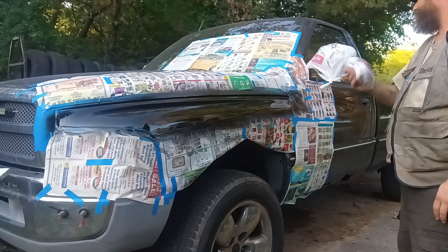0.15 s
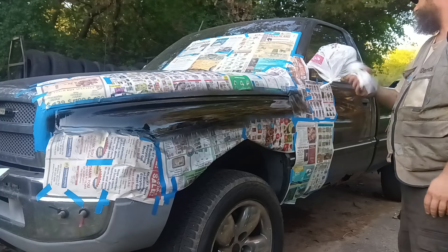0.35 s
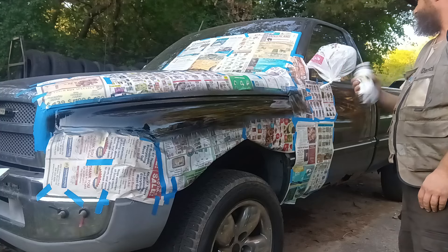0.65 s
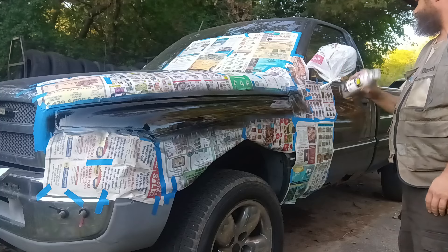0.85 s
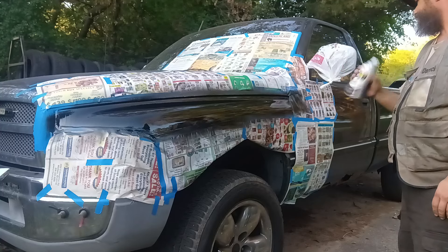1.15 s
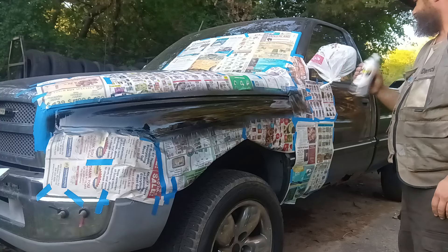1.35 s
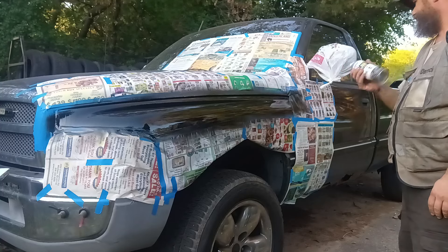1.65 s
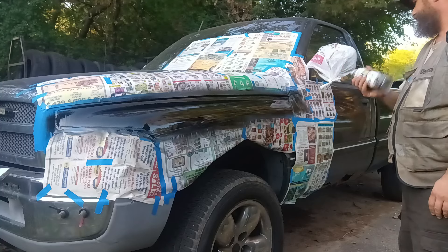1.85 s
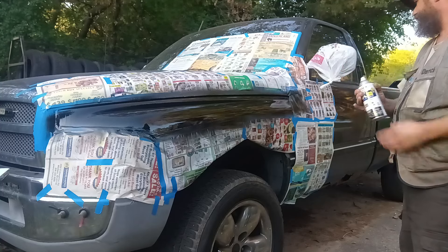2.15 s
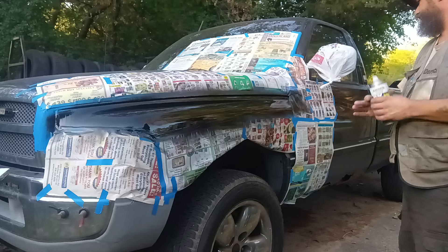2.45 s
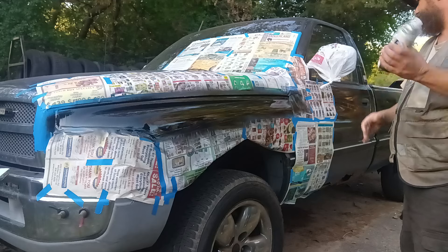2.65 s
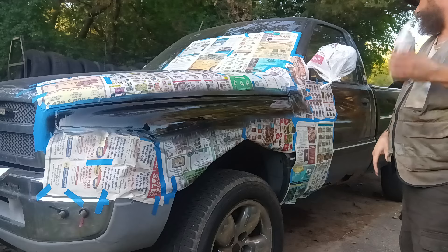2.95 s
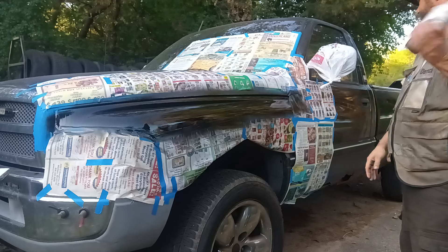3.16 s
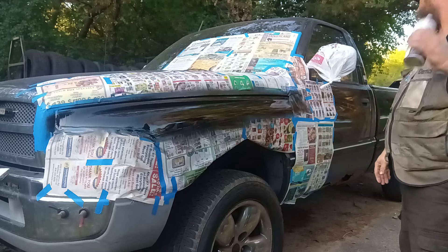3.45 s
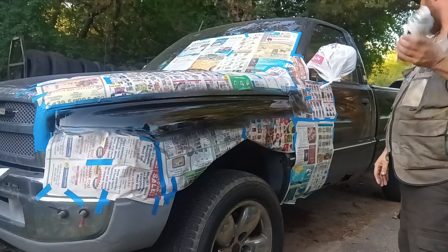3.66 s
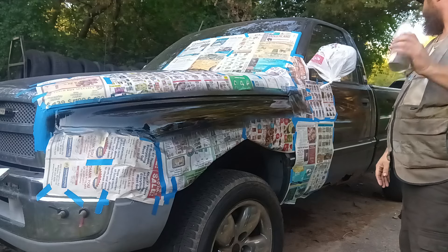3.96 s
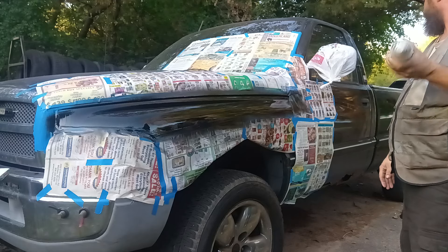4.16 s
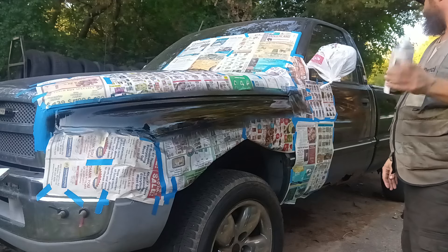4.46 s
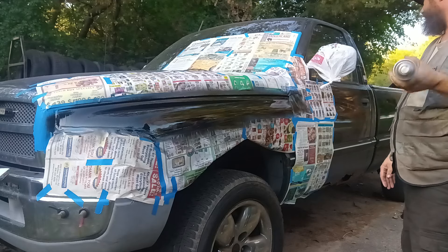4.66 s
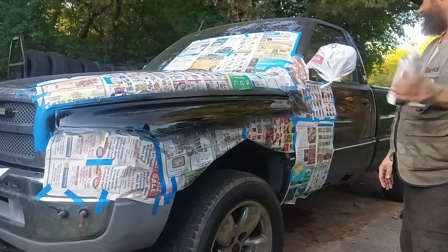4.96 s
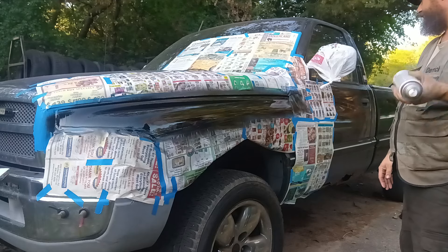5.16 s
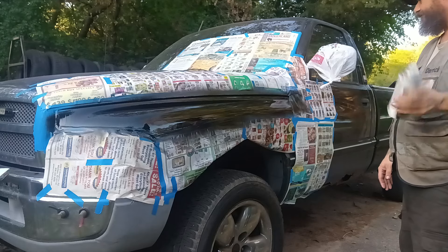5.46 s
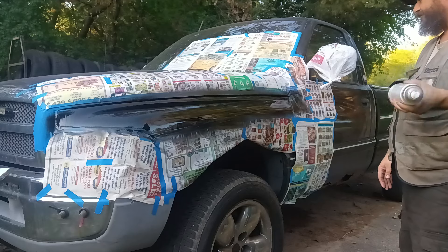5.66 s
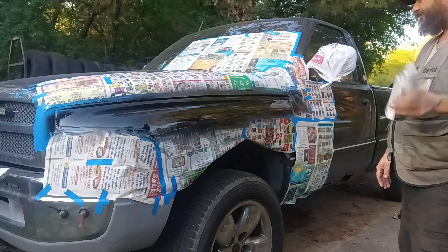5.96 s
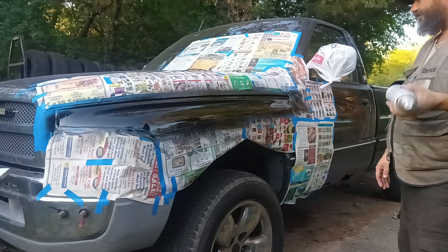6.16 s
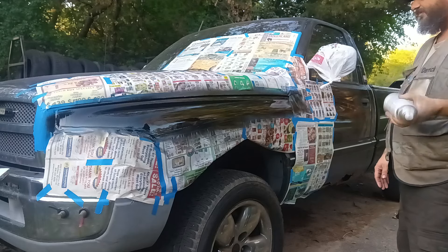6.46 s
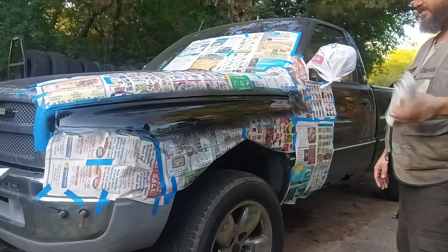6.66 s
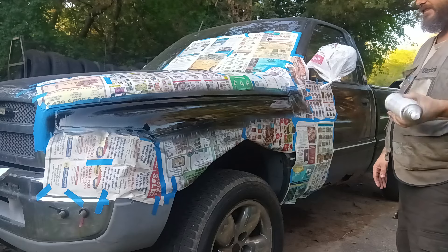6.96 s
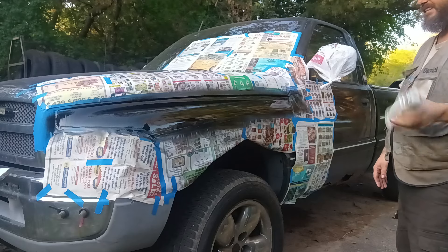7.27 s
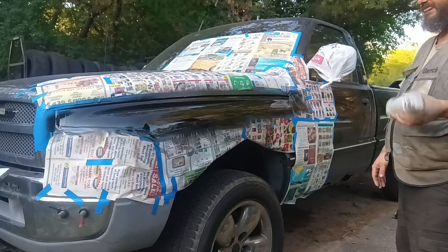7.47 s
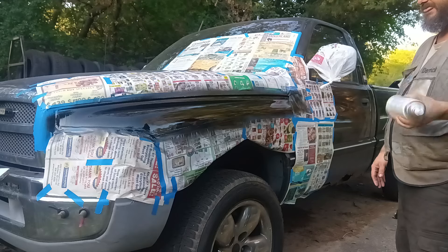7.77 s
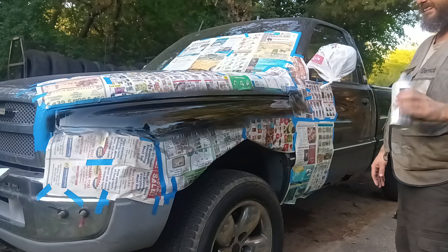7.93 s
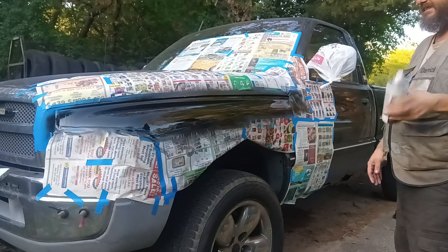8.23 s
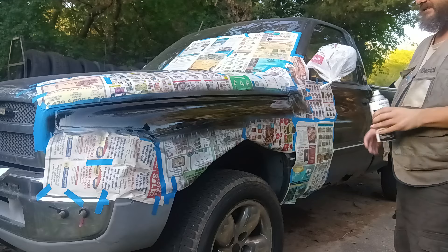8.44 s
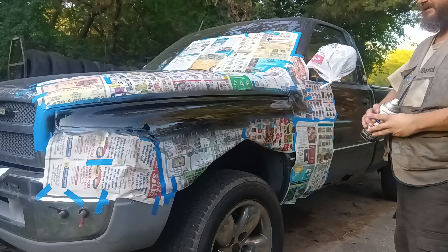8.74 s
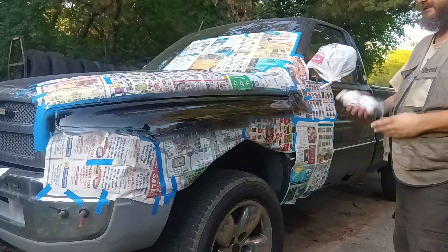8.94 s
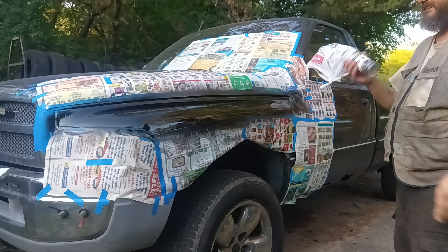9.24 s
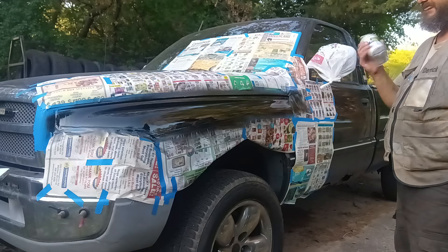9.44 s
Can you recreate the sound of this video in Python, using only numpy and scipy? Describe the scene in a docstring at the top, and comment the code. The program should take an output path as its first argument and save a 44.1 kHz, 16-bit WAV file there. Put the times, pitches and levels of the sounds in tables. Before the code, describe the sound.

In a quiet yard, with leaves softly hissing and a far, humming rumble, someone shakes an aerosol can near the microphone. The ball inside rattles in quick, bright, irregular clinks with a slight gritty scrape. After a short lull comes a longer stretch of shaking, then lighter, sparser clicks, a dull low bump and a last brief rattle as the background rises. The clicks have only very short reflections.

```python
"""Spray-paint can shaken beside a parked truck.

The mixing ball knocks the steel wall and domed ends, bounces and scrapes on. Ground and truck throw
each click back. Leaf hiss, far rumble and wavering hums fill the pauses. Two microphone ports a hand
apart hear it: the left one later, louder and with a sharp treble resonance."""
import sys
import numpy as np
from scipy import signal
from scipy.fft import rfft, irfft
from scipy.io import wavfile
from scipy.ndimage import uniform_filter1d

SR = 44100
rng = np.random.default_rng(int(sys.argv[2]) if len(sys.argv) > 2 else 0)


def generate_wav(signal):
    """Clip the signal to [-1, 1] and save it as 16-bit WAV at the path in sys.argv[1]."""
    frames = np.transpose(np.atleast_2d(signal))
    scaled = np.clip(frames, -1, 1) * 32767
    pcm = np.round(scaled).astype(np.int16)
    wavfile.write(sys.argv[1], SR, pcm)


N = 423360

# leaf hiss spectrum: f/Hz, relative density/dB
HISS_SPECTRUM = [(60, -15), (200, -2.5), (350, -20), (650, 1), (1020, -6.5), (2290, -9), (5650, -3.5),
                 (7060, 6.5), (9000, -17), (16500, -61)]
# far rumble spectrum: f/Hz, relative density/dB
RUMBLE_SPECTRUM = [(30, -28), (55, -29), (80, -14), (120, -6), (200, -31), (350, -18), (1000, -23),
                   (3000, -63)]
# background swell: t/s, hiss level/dB
SWELL = [(0, -40), (1.45, -42.5), (1.56, -48.5), (2.3, -46.5), (3.15, -38), (3.3, -42), (7.0, -47.5),
         (8.15, -38.5), (8.7, -29), (9.6, -33.5)]
# passing hums: start/s, end/s, f/Hz, level/dB
HUMS = [(.58, 1.36, 80, -47), (1.6, 4.06, 80.7, -55), (4.6, 7.21, 83.6, -59), (7.4, 14, 77.8, -45),
        (2.9, 3.92, 153, -54), (-.2, 0.96, 570, -52), (1.1, 1.65, 522, -51), (3.5, 5.2, 657, -57),
        (2.15, 3.3, 626, -45), (6.9, 7.9, 612, -55), (8.1, 8.51, 514, -48), (8.6, 10.4, 619, -44)]
# hand bumps: t/s, level/dB
THUMPS = [(8.531, -16)]
# ground and truck reflections: delay/s, level/dB
ECHOES = [(.0033, -14), (.0165, -21)]
# diffuse tail decay: f/Hz, t60/s
TAIL_DECAY = [(1200, 0.16), (3200, 0.11), (13000, 0.013)]
# ball on steel: t/s, wall level/dB, wall f/Hz, clink level/dB
KNOCKS = [(0.011, -14, 3730, -16), (0.1894, -9.5, 3780, -7), (0.2677, -17, 3580, -21.5),
          (0.359, -13.5, 3620, -18), (0.5274, -15, 5100, -9.5), (0.5498, -12.5, 3700, -38),
          (0.561, -19, 3230, -20.5), (0.7114, -11, 5020, -9.5), (0.8656, -12, 3640, -4),
          (0.8762, -20, 3360, -26), (0.9517, -12, 3820, -9.5), (0.9873, -18.5, 3380, -1),
          (1.0044, -17.5, 2170, -17), (1.0476, -18.5, 3360, -14), (1.0665, -12, 3370, -9.5),
          (1.122, -17.5, 3300, -19.5), (1.1465, -19, 3700, -20), (1.156, -22, 4020, -17.5),
          (1.191, -22.5, 3120, -30), (1.213, -7, 3480, -23), (1.2407, -7.5, 3600, -14),
          (1.2992, -15, 2940, -6.5), (1.3241, -15.5, 3370, -6), (1.409, -25, 3940, -14),
          (1.4405, -12, 3400, -7.5), (1.4563, -17, 3900, -7.5), (1.469, -19, 3950, -20),
          (1.5076, -14.5, 3050, -7.5), (1.5176, -29, 3230, -16), (1.5348, -21.5, 3470, -27),
          (1.6682, -24, 4820, -15), (1.7468, -22, 3150, -14), (1.7591, -28, 3540, -17),
          (1.8582, -18, 4120, -22.5), (1.9058, -11.5, 5180, -9), (1.9256, -18, 4070, -17),
          (2.2644, -46, 2200, -21), (2.589, -29.5, 2290, -23.5), (2.7836, -34, 4500, -22),
          (2.88, -29, 1680, -23), (2.9392, -34.5, 1420, -29), (3.0338, -19.5, 4600, -12),
          (3.1537, -12, 3130, -5.5), (3.1959, -24.5, 1390, -10), (3.2499, -14.5, 3770, -5),
          (3.2892, -16, 4840, -10.5), (3.3776, -21, 1600, -4), (3.482, -27, 1820, -25),
          (3.5698, -14, 3700, -10.5), (3.5876, -8, 3140, -9.5), (3.706, -15, 3200, -11),
          (3.7136, -7, 3200, -4), (3.8553, -16, 2360, -6.5), (3.8623, -9, 4240, -6.5),
          (3.8849, -14, 3180, -9), (3.8987, -15.5, 3640, -21), (3.927, -13.5, 3440, -41),
          (3.9823, -20, 3320, -16), (4.0032, -15.5, 5150, -15), (4.0421, -14.5, 4950, -11.5),
          (4.0696, -13, 3500, -22), (4.1298, -24, 3140, -14.5), (4.2076, -16.5, 3650, -11.5),
          (4.234, -8.5, 3250, -23), (4.3002, -20.5, 3600, -25), (4.3118, -29, 2530, -20.5),
          (4.3224, -19, 3420, -21), (4.3415, -10.5, 3660, -19), (4.3662, -22, 4840, -26),
          (4.3874, -19, 3830, -19.5), (4.4555, -18, 3350, -4.5), (4.5062, -9.5, 3340, -21),
          (4.5507, -13, 3290, -43), (4.6548, -20, 4960, -15.5), (4.7562, -15.5, 3260, -25),
          (4.8883, -20, 4800, -20), (5.0434, -32, 2380, -15), (5.0554, -27, 3320, -10.5),
          (5.1055, -20, 3350, -9.5), (5.132, -18, 3320, -40), (5.1603, -11.5, 3820, -18.5),
          (5.2902, -12.5, 3260, -10), (5.3398, -13.5, 3840, -7.5), (5.3723, -14, 3260, -25),
          (5.3944, -20, 3820, -9.5), (5.508, -11.5, 3200, -12), (5.5373, -16, 3750, -11),
          (5.54, -16, 3970, -8), (5.5862, -7.5, 5100, -4.5), (5.6361, -17, 3770, -18),
          (5.6508, -14.5, 3970, -23), (5.6664, -14.5, 3670, -20), (5.727, -22, 3750, -5.5),
          (5.754, -21, 3430, -40), (5.8321, -10, 5000, -6), (5.8495, -20, 4200, -20),
          (5.8747, -17, 3360, -22), (5.9126, -22, 3180, -19), (5.9297, -17, 3520, -18),
          (5.9796, -17, 3300, -9), (6.0121, -15, 3320, -26), (6.0756, -15.5, 3400, -14.5),
          (6.1103, -13, 3310, -19), (6.158, -16.5, 3680, -20), (6.2388, -14, 3800, -8),
          (6.2982, -15, 5080, -16), (6.352, -12.5, 3790, -10), (6.3696, -20, 3740, -11.5),
          (6.3877, -11.5, 3210, -26), (6.4367, -14.5, 4040, -16), (6.6005, -19, 3120, -3.5),
          (6.6685, -19.5, 4330, -7), (6.7001, -13.5, 3660, -11), (6.8148, -10.5, 3270, -21),
          (6.842, -22, 4040, -22.5), (6.8775, -14.5, 5000, -12.5), (6.9045, -17.5, 3350, -9),
          (6.9247, -10, 5290, -31), (7.1031, -27, 2520, -17), (7.132, -11.5, 3160, -25),
          (7.2193, -32, 5000, -26), (7.553, -35, 2020, -29), (7.5716, -22.5, 3060, -21.5),
          (7.7446, -28, 3500, -15.5), (7.835, -23.5, 3210, -21.5), (7.974, -25, 3560, -7),
          (7.9963, -45, 3660, -24), (8.0282, -31, 1800, -15.5), (8.0895, -23, 3100, -16),
          (8.1088, -23.5, 3230, -18), (8.1586, -21.5, 1310, -22.5), (8.2235, -17, 2000, -5.5),
          (8.288, -26.5, 2270, -13), (8.3394, -17.5, 3210, -18.5), (8.526, -29, 1550, -23),
          (8.544, -25, 1240, -22.5), (8.608, -22, 1240, -24), (8.9755, -26.5, 3140, -19.5),
          (9.2616, -16, 2210, -14), (9.366, -27, 1970, -18.5), (9.413, -32, 4070, -16),
          (9.4537, -5, 2440, -11.5), (9.4728, -37, 2250, -20.5), (9.5082, -24.5, 2510, -17),
          (9.5443, -19.5, 1530, -12), (9.5777, -31, 1760, -22)]
# wall modes, damped by paint and hand: ratio to wall f, level/dB, t60/s
WALL_MODES = [(0.798, 5, 0.0045), (1, 12, 0.007), (1.2, 3, 0.0091)]
# bright clink modes: f/Hz, level/dB, t60/s
CLINK_MODES = [(5320, 3.5, 0.002), (5905, 6.5, 0.004), (7058, 9.5, 0.0051), (7960, -0.5, 0.0023),
               (10980, -24.5, 0.0093), (13000, -28, 0.003)]
# hollow modes of the domed end: ratio to dome f, level/dB, t60/s
DOME_MODES = [(.75, 14.5, 0.0017), (1.02, 5.5, 0.0093), (1.351, 14, 0.0032)]
# dome tone, set by tilt and where the paint lies: t/s, dome f/Hz, level re knock/dB
DOME_TILT = [(2.6, 2050, -19.5), (2.9, 1400, -6.5), (3.5, 1730, -29.5), (3.9, 1870, -24), (7.2, 1805, -25),
             (8.1, 1390, -11.5), (9.5, 1170, -6.5)]
# left port's gain over the right: f/Hz, level/dB
LEFT_EXCESS = [(30, 5), (150, 2.5), (300, 8), (3300, 8.5), (5500, 11), (7200, 16), (8800, 0), (11000, -5),
               (15000, -6)]


def gain_of(db):
    """Decibels to gain."""
    return 10 ** (np.asarray(db) / 20)


def unit_rms(x):
    """Scales to rms 1."""
    return x / np.sqrt(np.mean(x ** 2) + 1e-20)


def at_hz(table, hz):
    """Spectrum table interpolated over log frequency."""
    f, value = np.transpose(table)
    return np.interp(np.log(hz + 1), np.log(f + 1), value)


def follow(table, column):
    """One column of a time table at every sample."""
    rows = np.array(table)
    return np.interp(np.arange(N) / SR, rows[:, 0], rows[:, column])


def patchy_noise(spectrum, coherence, patchy_db):
    """Stereo noise, rms 1, uneven over time and frequency."""
    frames, hz = N // 256 + 5, np.fft.rfftfreq(1024, 1 / SR)
    a, b, c, d, patches = rng.standard_normal((frames, 513, 5)).T
    patches = unit_rms(uniform_filter1d(uniform_filter1d(patches, size=8, axis=0), size=14, axis=1))
    left = a + 1j * b
    right = coherence * left + np.sqrt(1 - coherence ** 2) * (c + 1j * d)
    bins = np.array([left, right]) * gain_of(at_hz(spectrum, hz)[:, None] + patchy_db * patches)
    return unit_rms(signal.istft(bins, nperseg=1024, noverlap=768)[1][:, :N])


def leaves_and_rumble():
    """Leaf hiss and far rumble under one background level that rises and falls; the rumble follows it more
    steeply."""
    hiss_db = follow(SWELL, 1)
    rumble_db = 4.5 + 1.425 * hiss_db
    hiss = gain_of(hiss_db) * patchy_noise(HISS_SPECTRUM, coherence=.1, patchy_db=.6)
    return hiss + gain_of(rumble_db) * patchy_noise(RUMBLE_SPECTRUM, coherence=.3, patchy_db=4.5)


def hums():
    """Tones that waver at random, each fading in and out."""
    t, out = np.arange(N) / SR, np.zeros(N)
    for start_s, end_s, hz, db in HUMS:
        width_hz = hz / 40
        white = rng.standard_normal((N, 2)) @ [1, 1j]
        waver = signal.lfilter([1], [1, -np.exp(-np.pi * width_hz / SR)], white)
        tone = unit_rms((waver * np.exp(2j * np.pi * hz * t)).real)
        fade = np.sin(np.pi * np.clip((t - start_s) / (end_s - start_s), 0, 1)) ** .7
        out += gain_of(db) * fade * tone
    return out


def hand_thump(hz=110, t60_s=.027):
    """A hand bumps something soft: one damped low tone."""
    out = np.zeros(N)
    for start_s, db in THUMPS:
        age_s = np.maximum(np.arange(N) / SR - start_s, 0)
        out += gain_of(db - 60 * age_s / t60_s) * np.sin(2 * np.pi * hz * age_s)
    return out


def yard(direct, tail_db=-13, build_s=.006, turn_hz=3.1):
    """Adds echoes and a short diffuse tail; three responses take turns as the can moves."""
    reflected, size = np.zeros((2, N)), 8000
    for k in range(3):
        hz, t, bins = signal.stft(rng.standard_normal((2, size)), SR, nperseg=128)
        decay = gain_of(-60 * t / at_hz(TAIL_DECAY, hz)[:, None])
        response = signal.istft(bins * decay, SR, nperseg=128)[1][:, :size]
        response *= gain_of(tail_db) / np.linalg.norm(response[0])
        response *= np.minimum(np.arange(size) / SR / build_s, 1)
        for delay_s, db in ECHOES:
            response[:, round(delay_s * SR * rng.uniform(.9, 1.1))] += gain_of(db) * rng.choice([-1, 1])
        turn = np.sqrt(2 / 3) * np.cos(2 * np.pi * (np.arange(N) / SR * turn_hz + k / 3))
        reflected += signal.oaconvolve(turn * direct, response, axes=1)[:, :N]
    return direct + reflected


def ball_scrape(knocks, roll_s=.0089, ticks_per_s=3500):
    """The ball scrapes on after each knock: gritty ticks under the knocks' envelope."""
    pole = np.exp(-1 / (roll_s * SR))
    motion = signal.lfilter([1 - pole], [1, -pole], np.abs(knocks[0]))
    ticks = gain_of(3.6 * rng.exponential(1, (2, N)).clip(0, 5))
    ticks *= rng.random((2, N)) < ticks_per_s / SR
    ticks *= rng.choice([-1, 1], (2, N))
    return signal.sosfilt(signal.butter(4, [2300, 7800], "band", fs=SR, output="sos"), motion ** .8 * ticks)


def ball_bounces(hz, count=16, spread_db=13, fade_db_per_s=420, db_per_octave=3):
    """Impulses per mode: small bounces land on other spots, weaker as the ball slows."""
    when, softness = rng.random((2, count))
    spot_loss = rng.random((len(hz), count)) ** .5
    delay_s = .0025 + .045 * when ** 1.3
    level_db = -3.5 - spread_db * (spot_loss + softness) - fade_db_per_s * delay_s
    impulses = np.zeros((len(hz), 4000))
    impulses[:, (delay_s * SR).astype(int)] = gain_of(level_db)
    octaves_below = -np.log2(np.minimum(hz / 6000, 1))
    return impulses * gain_of(db_per_octave * octaves_below)  # lower modes stronger


def ball_knock(hz, db, t60_s, spot_db=2.8, side_db=3):
    """One blow and its bounces ring the modes. Paint shifts pitch; spot and side heard shift level."""
    t = np.arange(700) / SR
    scatter = rng.standard_normal((4, len(hz), 1))
    scatter[:3, :len(WALL_MODES)] = 0  # wall modes scatter only at the right port
    slosh, spot, side = scatter[0], scatter[1], scatter[2:]
    hz = hz * (1 + .04 * slosh)
    bounces = ball_bounces(hz)
    phase = 2 * np.pi * rng.random((len(hz), 1))
    contact = 1 - np.exp(-(t / (.092 * t60_s)) ** 2)  # ball presses in; long rings swell more slowly
    rings = contact * gain_of(db + spot_db * spot - 60 * t / t60_s) * np.sin(2 * np.pi * hz * t + phase)
    out = np.zeros((2, bounces.shape[1]))
    out[:, :len(t)] = (gain_of(side_db * side) * rings).sum(1)
    return out + signal.fftconvolve(bounces, rings, axes=1)[:, :out.shape[1]].sum(0)


def spray_can(scrape_db=-1.5, low_cut_hz=900):
    """Knocks and scrape of the mixing ball; the small can radiates little bass."""
    knocks = np.zeros((2, N + SR))
    dome_hz, dome_db = follow(DOME_TILT, 1), follow(DOME_TILT, 2)
    counts = [len(WALL_MODES), len(CLINK_MODES), len(DOME_MODES)]
    pitch, mode_db, t60_s = np.transpose(WALL_MODES + CLINK_MODES + DOME_MODES)[:, :, None]
    for start_s, wall_db, wall_hz, clink_db in KNOCKS:
        at = round(start_s * SR)
        scale = np.repeat([wall_hz, 1, dome_hz[at]], counts)[:, None]
        drive_db = np.repeat([wall_db, clink_db, dome_db[at] + max(wall_db, clink_db)], counts)[:, None]
        knock = ball_knock(pitch * scale, mode_db + drive_db, t60_s)
        knocks[:, at:at + knock.shape[1]] += knock
    knocks = knocks[:, :N]
    low_cut = signal.butter(4, low_cut_hz, "high", fs=SR, output="sos")
    return signal.sosfilt(low_cut, knocks + gain_of(scrape_db) * ball_scrape(knocks))


def scene():
    """The can in the yard over the background."""
    return yard(spray_can()) + leaves_and_rumble() + hums() + hand_thump()


def record(dry):
    """Left port late, right port weaker with a treble dip; then soft overload and band limit."""
    lag_samples, ceiling, edge_hz = 29, .9, 16000
    left = np.r_[np.zeros(lag_samples), dry[0, :-lag_samples]]
    right = irfft(rfft(dry[1]) / gain_of(at_hz(LEFT_EXCESS, np.fft.rfftfreq(N, 1 / SR))), N)
    ports = np.array([left, right])
    limited = ports / (1 + (ports / ceiling) ** 4) ** .25
    low_pass = signal.firwin(511, edge_hz, window=("kaiser", 9), fs=SR)
    return signal.oaconvolve(limited, low_pass[None], "same")


dry = scene()
out = record(dry)
generate_wav(out)
```